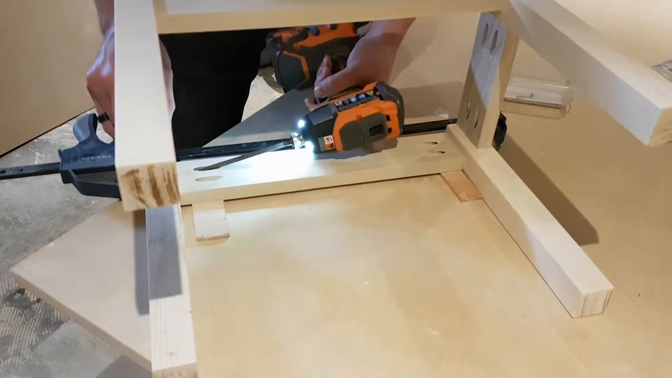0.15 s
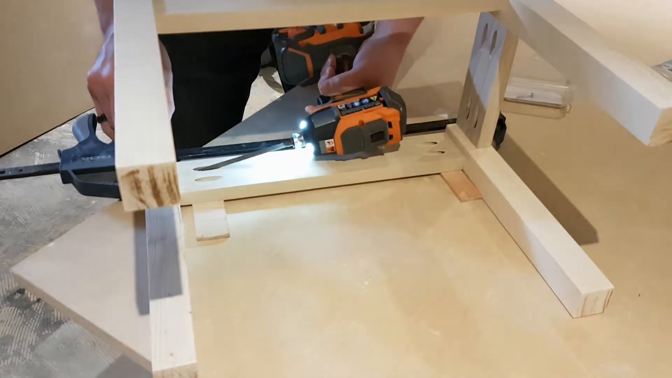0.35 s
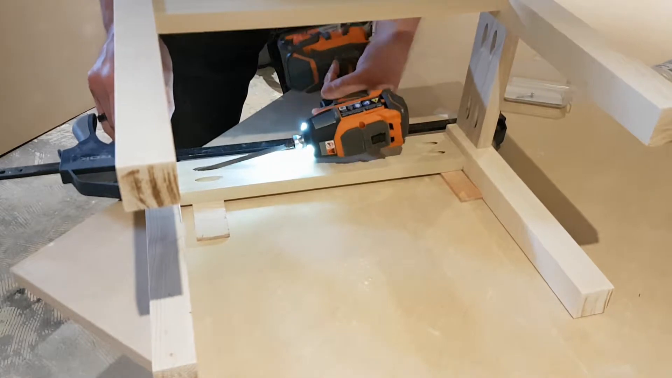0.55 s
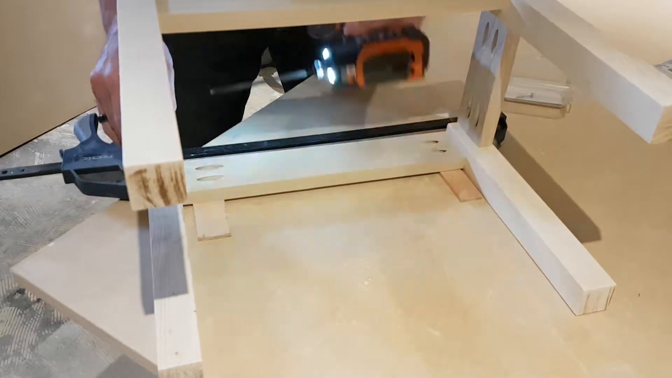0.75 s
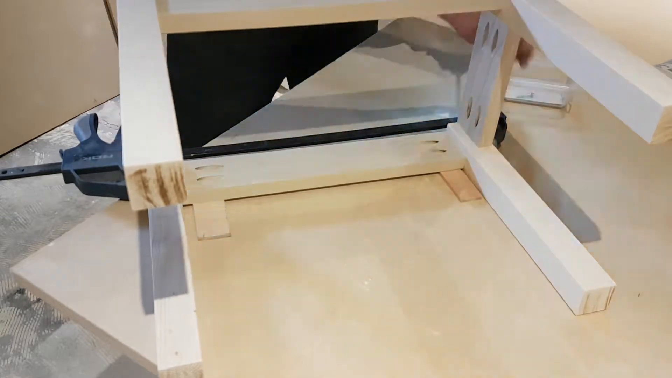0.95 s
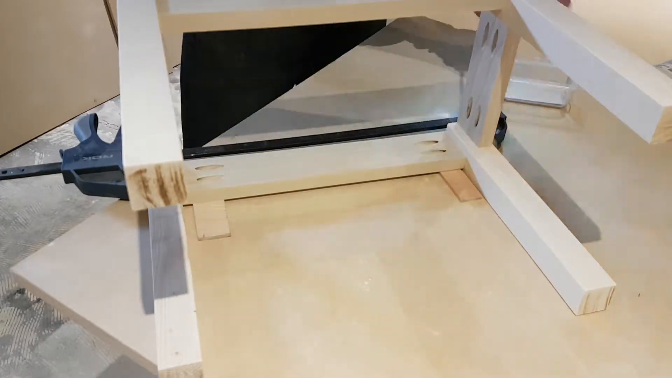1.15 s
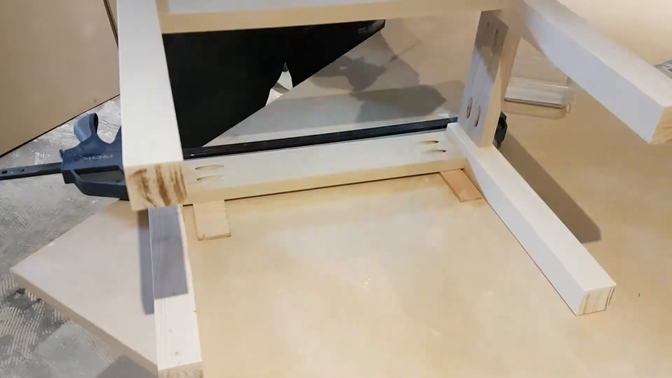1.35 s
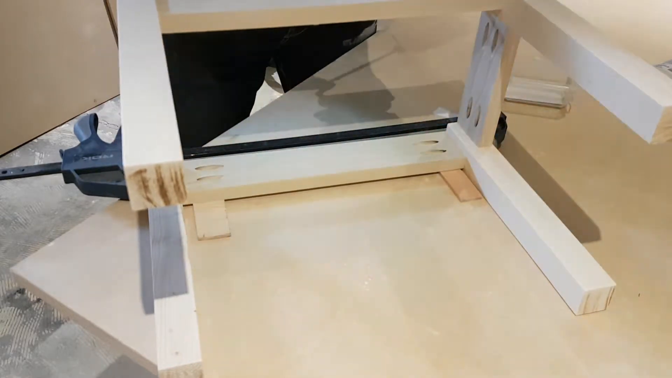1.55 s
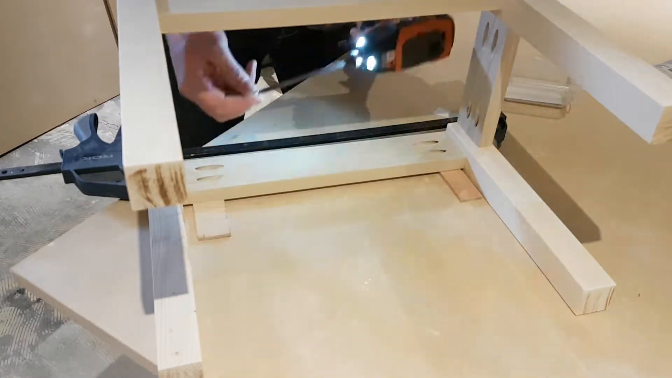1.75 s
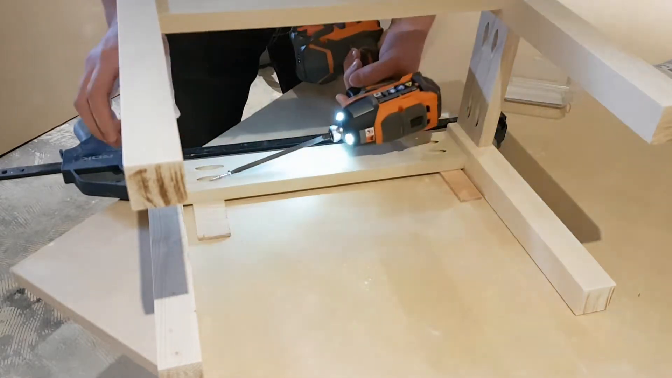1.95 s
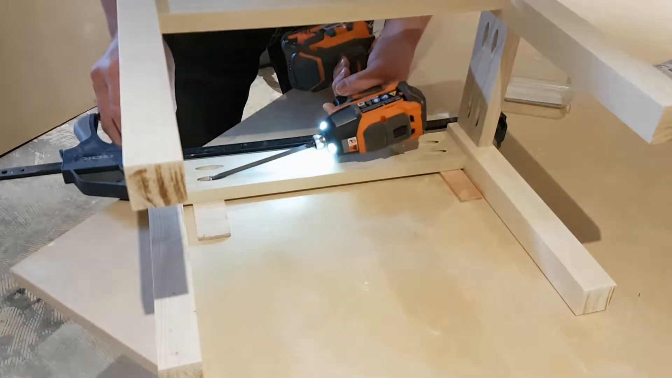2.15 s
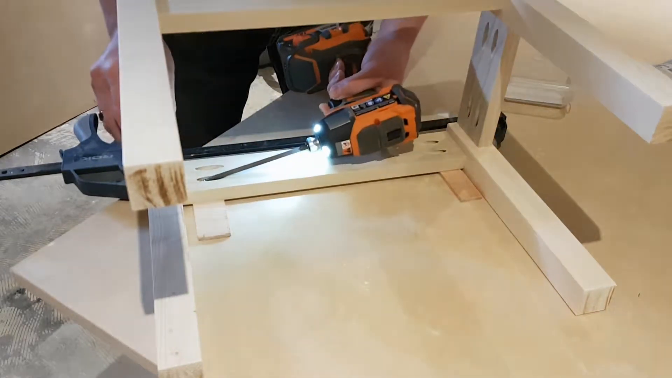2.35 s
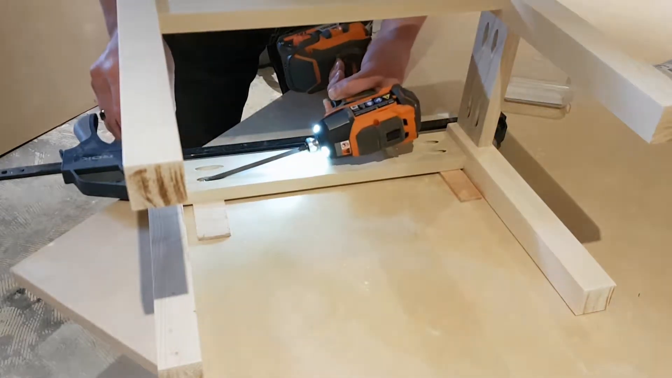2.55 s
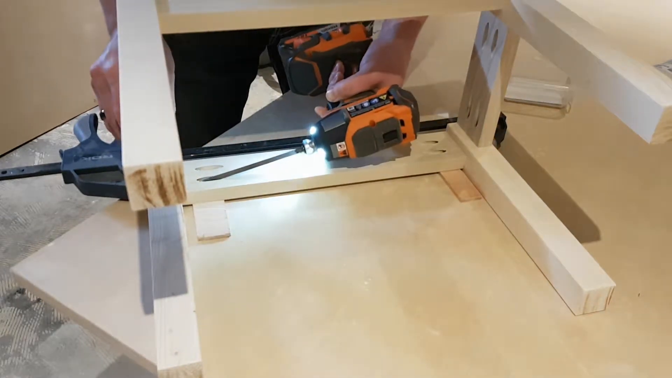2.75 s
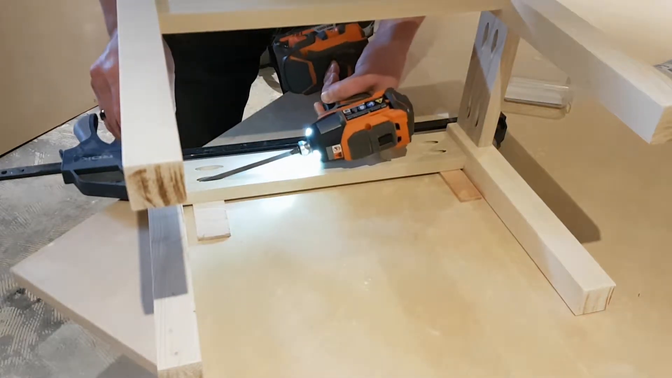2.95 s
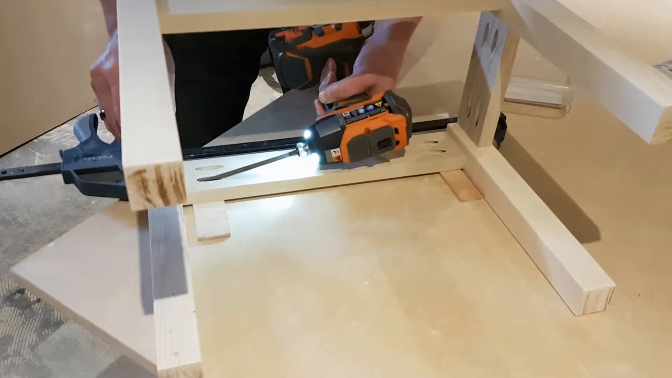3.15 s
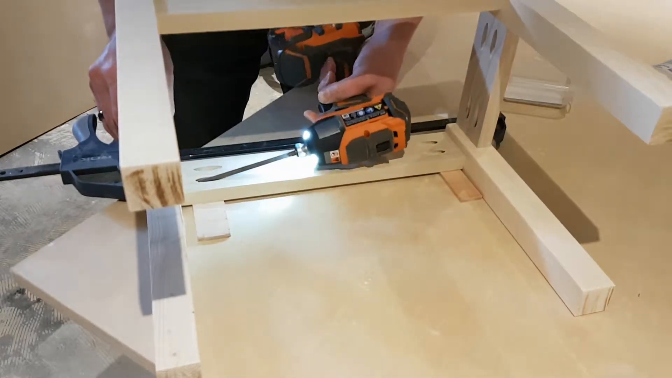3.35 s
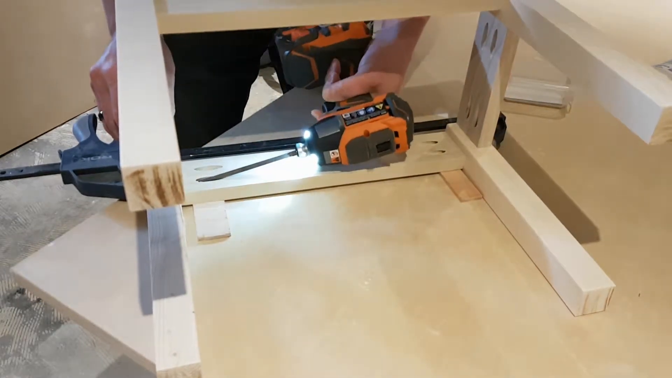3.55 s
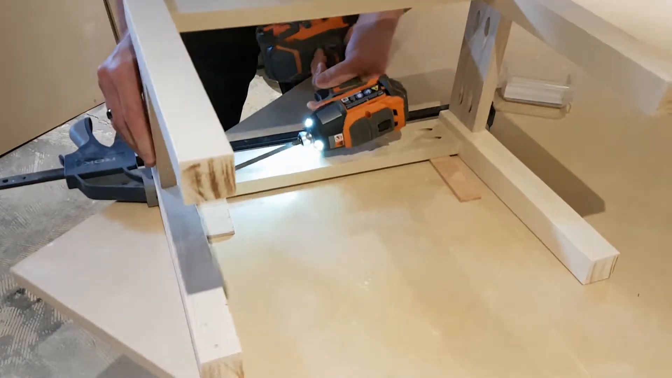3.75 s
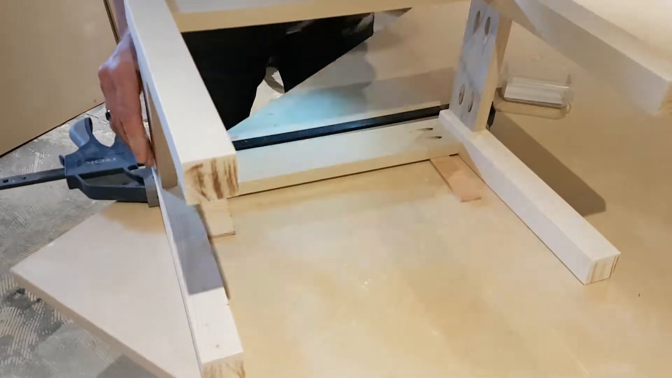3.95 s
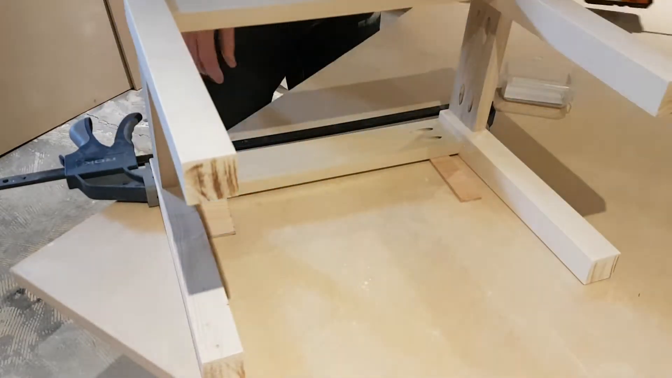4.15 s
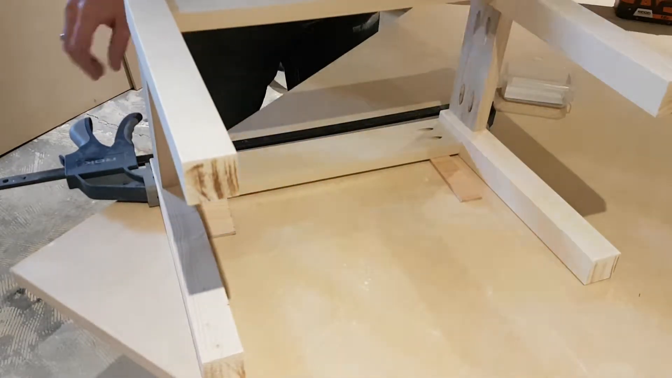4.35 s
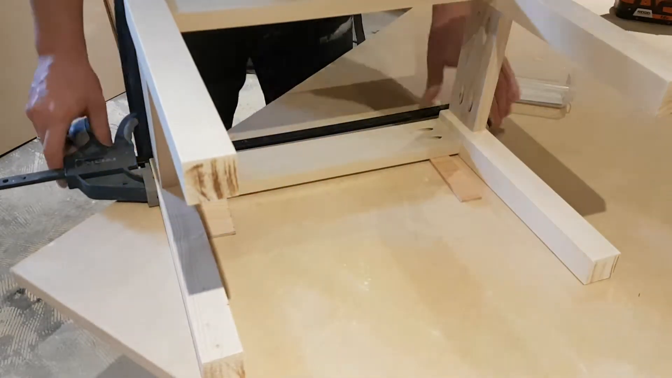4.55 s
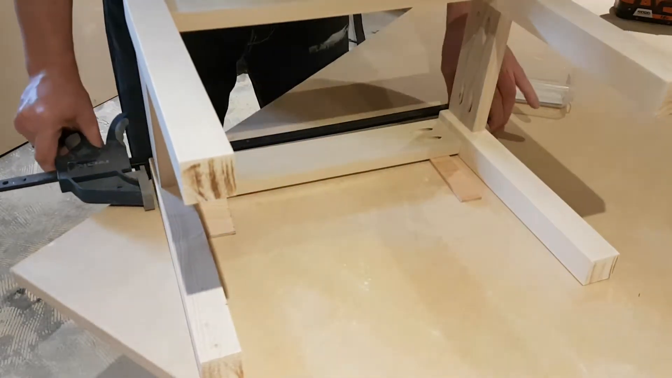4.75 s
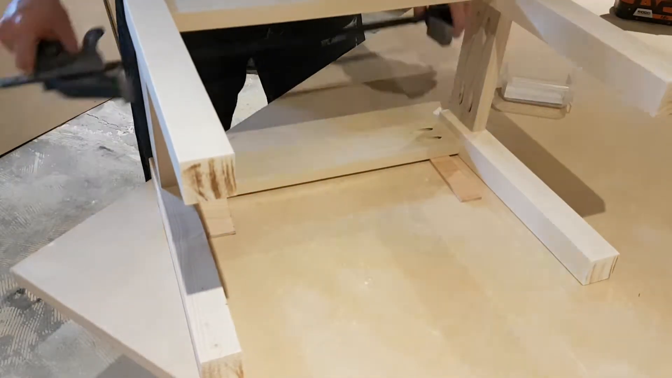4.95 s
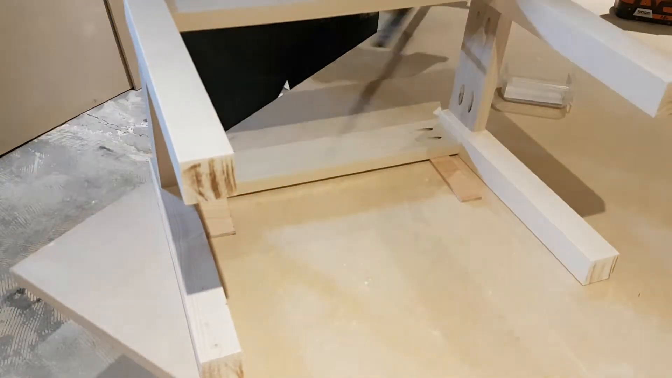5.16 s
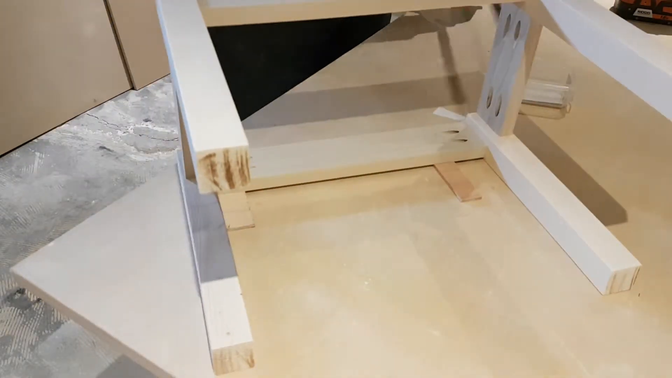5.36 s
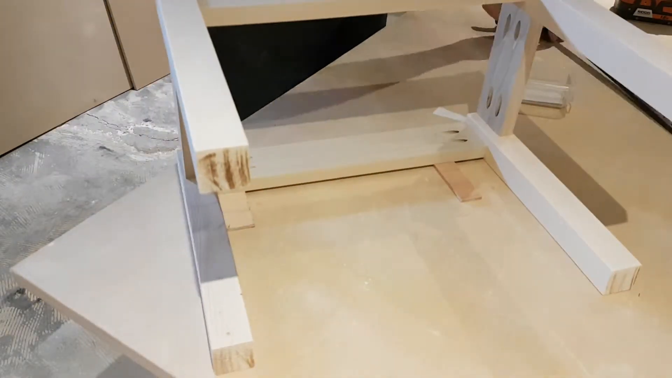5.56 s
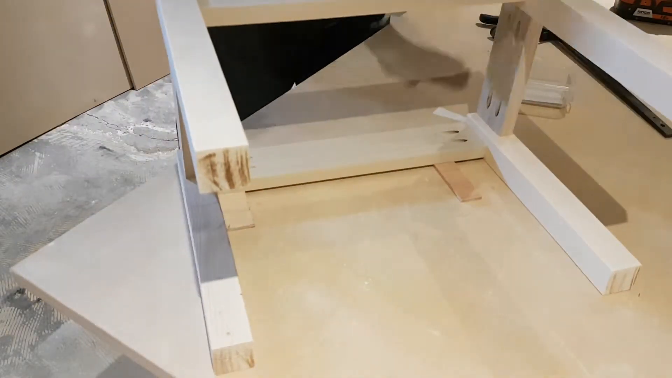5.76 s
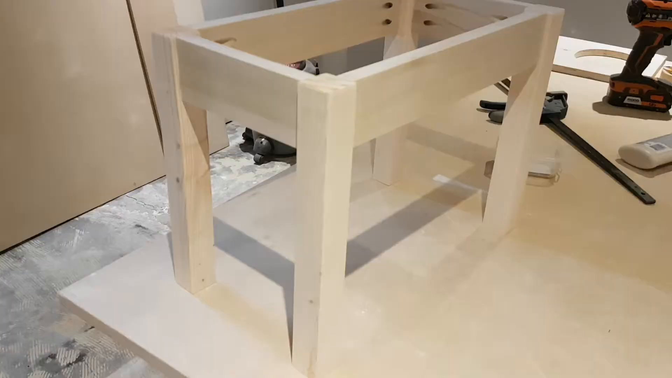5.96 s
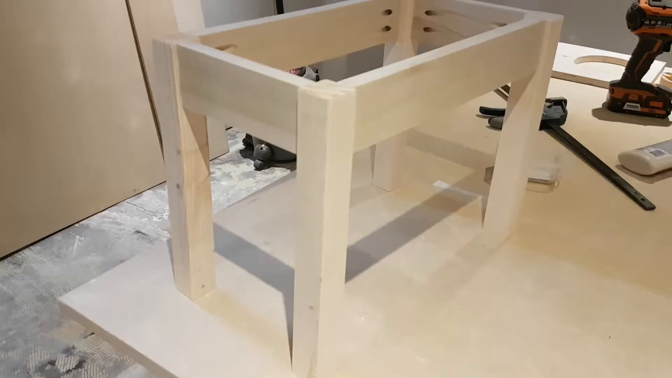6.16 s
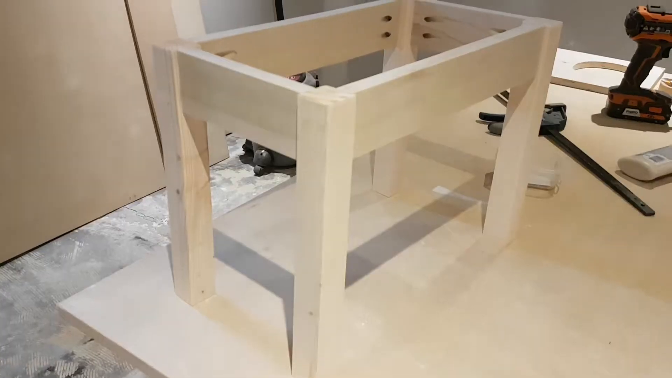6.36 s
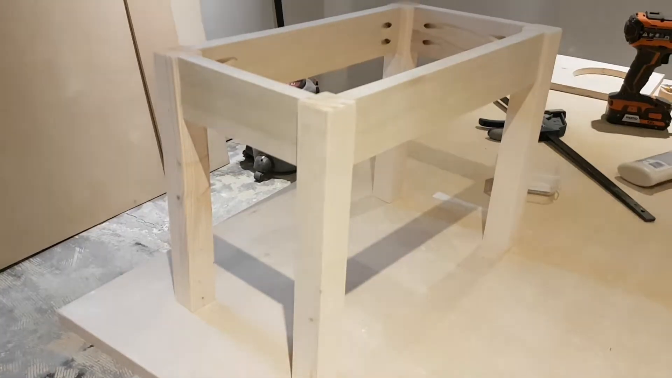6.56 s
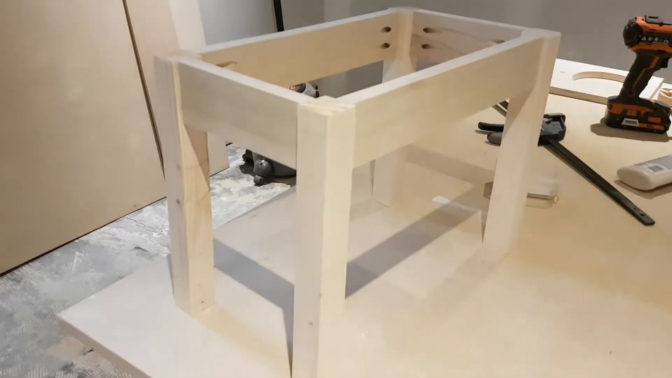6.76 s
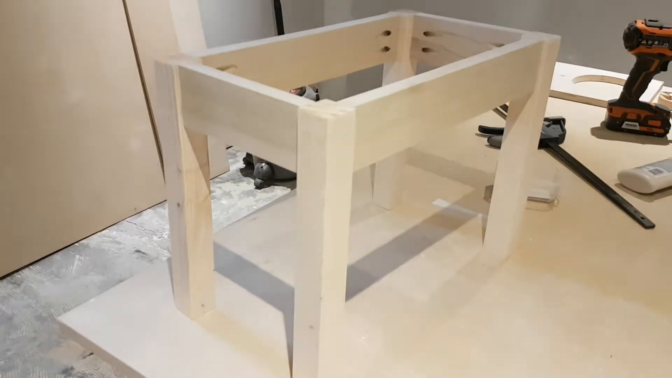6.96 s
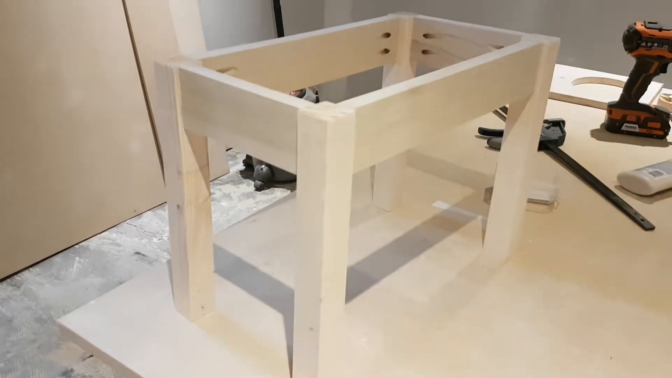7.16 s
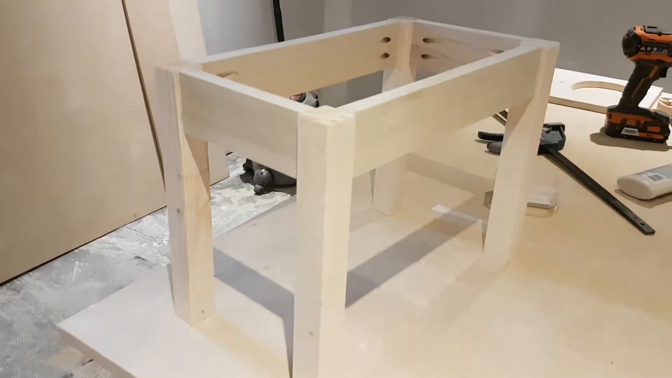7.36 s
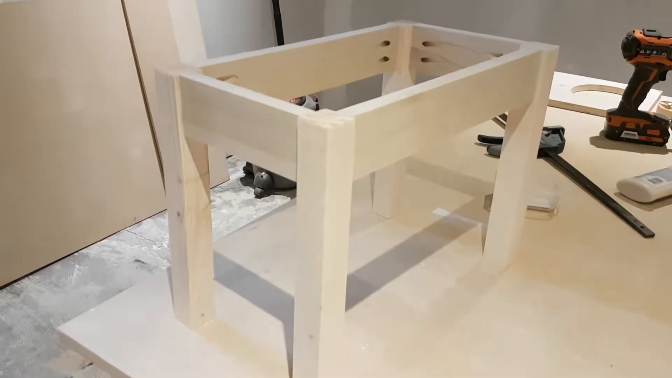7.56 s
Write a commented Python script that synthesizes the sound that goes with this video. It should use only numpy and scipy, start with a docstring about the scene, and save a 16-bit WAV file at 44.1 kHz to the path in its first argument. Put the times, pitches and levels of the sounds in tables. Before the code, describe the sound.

A cordless drill squeaks and judders in short bursts driving screws into a wooden frame, then clamp clacks and hard wooden knocks in a small workshop.

```python
"""A cordless drill drives pocket screws into a wooden frame in a small workshop.
It turns in short surges: stick-slip trains squeak and judder through the frame's resonances, over motor whine.
Then the frame is shifted, a bar clamp snaps open and slides off, and the frame is set down on a board:
filtered noise bursts for knocks and scrapes, a decaying sine for the bar. Room noise, hum and hiss lie below."""
import sys
import numpy as np
from scipy import signal
from scipy.fft import rfft, irfft, next_fast_len
from scipy.io import wavfile
from scipy.ndimage import uniform_filter1d

SR = 44100
rng = np.random.default_rng(int(sys.argv[2]) if len(sys.argv) > 2 else 0)


def pcm_store(signal):
    """Save signal as 16-bit PCM."""
    levels = np.round(np.clip(np.atleast_2d(signal), -1, 1) * 32767)
    wavfile.write(sys.argv[1], SR, levels.astype(np.int16).T)


N = 335468  # samples
TAPS = 8192
HZ = np.fft.rfftfreq(TAPS, 1 / SR)

# drill surges: (bite time [s], rise [s], hold [s], relative level [dB], binding [0-1],
# squeal [Hz], squeal lift [dB], rasp lift [dB], motor whine level [dB])
SURGE_TABLE = [(-.04, .021, .019, -16, 0.09, 2220, 5, 1, -49.5),
               (0.063, 0.022, 0.022, -16.5, .2, 2180, 5.5, 0.5, -54),
               (.183, 0.022, 0.037, -15, 0.86, 2260, 6, -2.5, -50),
               (.298, 0.025, 0.021, -15, 0.98, 2250, 3, -3.5, -53.5),
               (2.615, 0.009, .008, -42, .3, 850, 6, -11, -45.5),
               (2.625, 0.0076, 0.02, -19, 0.97, 4320, -2.5, 6, -43),
               (2.742, 0.023, 0.03, -22, 0.48, 3540, 4, 5.5, -44),
               (2.869, 0.023, .015, -19, 0.46, 2250, 0, 1.5, -46),
               (2.977, 0.026, .018, -20.5, .25, 1970, 5.5, -1, -41.5),
               (3.088, 0.018, 0.021, -28, 0.11, 850, 8.5, -11, -40.5),
               (3.193, 0.022, 0.059, -16.5, 0.88, 2130, 0, -2, -45.5),
               (3.355, 0.015, 0.021, -15.5, 0.92, 1400, 7, -0.5, -55.5)]
# click of touching surfaces: (frequency [Hz], relative density [dB per Hz])
CLICK_SPECTRUM = [(500, -10.5), (3000, 5.5), (6800, -2.5), (9000, -15.5), (12500, -16), (16000, -13.5)]


def screw():
    """The thread squeaks by stick-slip in each surge; where it binds, coarse slips shake the frame."""
    # thread stick-slip: (frequency [Hz], relative density [dB per Hz])
    squeak_spectrum = [(100, -39.5), (450, -16.5), (700, -7), (1050, -9), (1500, -2.5), (2200, -3),
                       (3100, -8), (4400, -5.5), (5500, -14.5), (7200, -15.5), (8800, -26.5),
                       (12500, -29.5), (16000, -30)]
    # coarse slips when binding: (frequency [Hz], relative density [dB per Hz])
    judder_spectrum = [(30, -12.5), (70, -1.5), (140, -1), (300, -0.5), (600, -0.5), (1300, 0),
                       (2500, -5.5), (7000, -13.5), (9000, -23.5), (12500, -15), (16000, -22.5)]
    slips_per_s, judder_per_s = 760, 380
    sag_db_per_s = 78  # the push tires while held
    free_rough, bound_rough = .3, .75  # a binding screw slips more unevenly
    free_judder_db, bound_judder_db = -18.5, -1.5  # relative, and shakes the frame harder
    judder_onset = 0.9  # share of the rise

    out, frame = np.zeros(N), frame_gain()
    rasp_band = 1 / (1 + (3000 / (HZ + 1)) ** 4)
    for bite_s, rise_s, hold_s, db, binding, squeal_hz, squeal_db, rasp_db, _ in SURGE_TABLE:
        t, push = stroke(rise_s, hold_s, -sag_db_per_s * hold_s, foot_db=-25)
        push = push * flutter(t, depth_db=2.8, step_s=.004)

        rough = blend(free_rough, bound_rough, binding)
        squeak = slips(t, slips_per_s, jitter=.45 * rough, spread_db=2)
        squeak = unit(squeak + .5 * rng.standard_normal(len(t)))
        tone_db = read(squeak_spectrum) + rasp_db * rasp_band + squeal_db * bump(squeal_hz, octaves=0.1)
        add(out, bite_s, amp(db) * colour(squeak * push, frame * amp(tone_db)))

        judder_db = blend(free_judder_db, bound_judder_db, binding)
        bound = np.clip((t - judder_onset * rise_s) / 0.014, 0, 1)
        judder = slips(t, judder_per_s, jitter=.5, spread_db=0)
        judder = judder + .5 * rng.standard_normal(len(t))
        shaken = colour(judder * push * bound, frame * amp(read(judder_spectrum)))
        add(out, bite_s, amp(db + judder_db - 1.5) * shaken)
    return out


def motor(tick_db=-48, gears_db=-4, overtone_db=-21):
    """Each start gives a thin tick, then the whine of the chopped motor current over gear noise."""
    whine_hz, waver_share = 3860, 0.089
    lead_s = 0.012  # the motor switches on this long before the screw bites
    # (frequency [Hz], relative density [dB per Hz])
    gear_spectrum = [(150, -9), (800, 2), (1900, 1), (3000, -5), (5600, -8.5), (9000, -28)]
    tick_spectrum = [(1500, -15), (6000, 1), (15000, 3)]

    out = np.zeros(N)
    for bite_s, rise_s, hold_s, *_, db in SURGE_TABLE:
        start_s = bite_s - lead_s
        t, on = stroke(0.0068, rise_s + hold_s, foot_db=-11, half_fade_s=.008)
        tick, gears, waver = rng.standard_normal((3, len(t)))
        phase = 2 * np.pi * np.cumsum(whine_hz * (1 + waver_share * waver)) / SR
        whine = np.sqrt(2) * (np.sin(phase) + amp(overtone_db) * np.sin(2 * phase))
        add(out, start_s, amp(db) * on * whine)
        add(out, start_s, amp(db + gears_db) * colour(on * gears, amp(read(gear_spectrum))))
        tick = tick * np.exp(-t / 0.0044)
        add(out, start_s, amp(tick_db) * colour(tick, amp(read(tick_spectrum))))
    return out


def knocks(chatter_db=3):
    """In each blow the surfaces graze, meet in a sharp push and chatter for a few milliseconds."""
    # wood, drill and clamp: (contact time [s], relative level [dB], hardness [0-1],
    # struck part's resonance [Hz], its lift [dB])
    blow_table = [(.545, -55.5, 0.25, 166.5, 20), (0.641, -51.5, 0.49, 203, 18),
                  (1.036, -45.5, 0.4, 602, 9), (1.081, -56.5, 0.64, 301, 13), (1.424, -53, 0.65, 448, 22),
                  (1.519, -69, 0.98, 303, -10), (1.661, -66, 0.75, 301.5, -12),
                  (1.772, -58.5, 0.66, 200, -3), (2.014, -59, 0.57, 201, -8), (2.048, -49.5, 0.42, 303, 12),
                  (2.283, -46, 0.4, 434, 14), (2.442, -51, 0.6, 148, 21.5), (2.516, -59.5, 0.51, 200, 1),
                  (2.59, -57, 0.78, 200, -4), (2.634, -22, 0.86, 200, -1), (3.029, -27, 0.57, 1890, 15),
                  (3.226, -18, 0.74, 200, 0), (3.387, -23.5, 0.48, 298, .5), (3.647, -28, 0.52, 1700, 8.5),
                  (3.798, -43.5, 0.55, 159, 14.5), (3.857, -39, 0.18, 130, 16), (3.862, -33, 0.4, 1930, 9),
                  (4.347, -40, .26, 140, 18.5), (4.405, -50.5, 0.37, 130.7, 21),
                  (4.596, -57, .05, 141.5, 24.5), (4.644, -57, 0.14, 138, 26),
                  (4.761, -30.5, 0.68, 300, -14), (4.764, -19.5, 0.76, 400, 11.5),
                  (4.770, -22, 0.49, 159, 20.5), (4.89, -44.5, 0.65, 203, 1.5),
                  (5.162, -43.5, 0.67, 3000, 7), (5.259, -22.5, .45, 400, 6.5),
                  (5.264, -27.5, 0.35, 286, 15), (5.594, -26.5, 0.24, 260, 9.5),
                  (5.697, -14.5, 0.24, 1100, 3.5), (5.703, -14, 0.38, 200, 6)]
    # a harder knock is brighter, clicks more and chatters less
    soft_corner_hz, hard_corner_hz = 596, 6040
    soft_click_db, hard_click_db = -50.5, 14
    soft_chatter_s, hard_chatter_s = .008, .0016  # twice the decay constant

    out, t = np.zeros(N), np.arange(SR // 10) / SR
    for contact_s, db, hardness, ring_hz, ring_db in blow_table:
        corner_hz = soft_corner_hz * (hard_corner_hz / soft_corner_hz) ** hardness
        click_db = blend(soft_click_db, hard_click_db, hardness)
        chatter_s = soft_chatter_s * (hard_chatter_s / soft_chatter_s) ** hardness
        graze_s = np.clip(chatter_s, 1e-3, .03) / 2
        blow = rng.standard_normal(len(t)) * t * np.exp(-t / graze_s)
        blow *= amp(chatter_db) / np.linalg.norm(blow)
        blow[round(graze_s * SR)] += 1  # the sharp push
        ring = colour(even(blow, size=41), contact(ring_db, ring_hz, corner_hz, click_db))
        add(out, contact_s - graze_s, amp(db + 27) * ring / np.linalg.norm(ring))
    return out


def contact(ring_db, ring_hz, corner_hz, click_db):
    """Contact spectrum: struck part's resonance, a body a harder touch extends upward, a surface click."""
    # any contact with the frame: (frequency [Hz], relative density [dB per Hz])
    body_spectrum = [(20, -19.5), (45, -9), (80, -2), (140, -4), (400, 0.5), (750, -1), (1300, 3),
                     (2300, 4), (4000, -2)]
    ring_octaves = .85 * (200 / ring_hz) ** .35  # higher resonances are narrower
    body = amp(read(body_spectrum) + ring_db * bump(ring_hz, ring_octaves))
    softness = 1 / np.sqrt(1 + (HZ / corner_hz) ** 6)
    # a stronger click is also briefer, so it reaches further into the treble
    snap_db = np.clip(.45 * (click_db + 14), -6, 8) * bump(11500, octaves=.4)
    click = amp(click_db + snap_db + read(CLICK_SPECTRUM))
    low_cut = (HZ + 10) / np.hypot(HZ, 40)
    return frame_gain() * np.hypot(body * softness, click) * low_cut


def scrapes(grain_db=4.0):
    """Sliding surfaces catch on many small grains: a rasp, the frame's rumble and a fine hiss."""
    # slides on wood: (start [s], length before fade [s], relative level [dB], rasp [Hz],
    # rasp width [octaves], rumble lift [dB])
    slide_table = [(0.661, 0.068, -51.5, 1495, 0.74, 20), (0.713, 0.051, -47.5, 2200, 0.19, -4),
                   (3.663, 0.082, -45, 1400, 0.76, 16), (3.788, .058, -52, 1600, 0.71, 13.5),
                   (3.86, 0.042, -49, 1700, .6, 5), (4.599, 0.091, -69, 2000, 1, 5.5),
                   (4.827, 0.047, -56.5, 2200, 1, 3), (5.018, 0.056, -46, 2390, 0.37, -15),
                   (5.054, .045, -39.5, 2040, 0.74, -13.5), (5.147, 0.058, -41.5, 2300, 0.93, -13),
                   (6.617, 0.15, -68, 1200, 1, 14)]
    # frame under a sliding touch: (frequency [Hz], relative density [dB per Hz])
    rumble_spectrum = [(20, -10), (90, 1.5), (160, -1.5), (320, -0.5), (600, -1), (1500, -6), (3500, -23),
                       (8000, -65)]
    swell_share = 0.48  # part of a slide spent building up pressure
    hiss_base_db, hiss_db_per_octave = -29, 26  # the broader the rasp, the more it hisses

    out = np.zeros(N)
    for start_s, length_s, db, rasp_hz, octaves, rumble_db in slide_table:
        rise_s, hold_s = swell_share * length_s, (1 - swell_share) * length_s
        t, push = stroke(rise_s, hold_s, foot_db=-18, half_fade_s=.014)
        noise, size = rng.standard_normal((2, len(t)))
        grains = unit(noise * amp(grain_db * unit(uniform_filter1d(size, 40))))
        rasp = bump(rasp_hz, octaves)
        rumble = amp(rumble_db + read(rumble_spectrum))
        hiss = amp(hiss_base_db + hiss_db_per_octave * octaves + read(CLICK_SPECTRUM))
        tone = np.linalg.norm([rasp, rumble, hiss], axis=0)
        add(out, start_s, amp(db) * colour(grains * push, frame_gain() * tone))
    return out


def clamp_bar():
    """The steel bar of the clamp rings on faintly after a hard jolt: a decaying sine."""
    # jolts: (time [s], peak level [dB])
    jolt_table = [(3.387, -50.5), (5.703, -55.5)]
    bar_hz, t60_s = 556, 0.73
    out, t = np.zeros(N), np.arange(SR) / SR
    for jolt_s, db in jolt_table:
        add(out, jolt_s, amp(db - 60 * t / t60_s) * np.sin(2 * np.pi * bar_hz * t))
    return out


def background(shared=0.47):
    """Low room noise, partly common to both channels, mains hum and a fine microphone hiss."""
    # room noise: (frequency [Hz], relative density [dB per Hz])
    air_spectrum = [(20, -13), (42, -4), (60, -7.5), (120, -8.5), (230, -13), (400, -14.5), (550, -16.5),
                    (900, -19), (2900, -25.5), (4500, -32.5), (15500, -46.5)]
    # room noise: (time [s], level [dB])
    air_level = [(0, -69), (5.95, -68), (6.02, -70), (7.6, -69.7)]
    # hum partials: (frequency [Hz], level before the hum gain [dB])
    hum_partials = [(59.2, -72.5), (236.9, -82), (296.1, -85.5), (468.3, -89)]
    # hum dips, then swells: (time [s], gain [dB])
    hum_gain = [(5.9, -4.5), (6.05, -13), (6.8, 1.5)]
    # (frequency [Hz], relative density [dB per Hz])
    hiss_spectrum = [(3000, -1), (9000, -8), (12500, -3), (16000, -5.5)]
    hiss_db = -78

    t = np.arange(N) / SR
    air_gain = amp(read(air_spectrum))
    left, right, common = (colour(rng.standard_normal(N + TAPS), air_gain)[TAPS:TAPS + N] for _ in range(3))
    air = unit(np.array([left, right]) + shared * common) * amp(np.interp(t, *np.transpose(air_level)))
    hum = np.zeros(N)
    for hz, db in hum_partials:
        hum += np.sqrt(2) * amp(db) * np.sin(2 * np.pi * (hz * t + rng.random()))
    hum *= amp(np.interp(t, *np.transpose(hum_gain)))
    hiss = np.array([colour(rng.standard_normal(N), amp(read(hiss_spectrum)))[:N] for _ in range(2)])
    return air + hum + amp(hiss_db) * hiss


def workshop(x, direct_db, lag_s, count=5):
    """Parts of the frame radiate in turn by their own paths; left microphone up to lag_s further off."""
    turn = np.arange(N) / SR / .007  # 7 ms per part
    out = np.zeros((2, N))
    for k in range(count):
        share = np.cos(np.pi / 2 * np.minimum(abs((turn - k + 1) % count - 1), 1))
        paths = np.array([path(direct_db, lag_s * (k + 1) / count), path(direct_db, 0)])
        out += signal.oaconvolve((x * share)[None], paths, axes=1)[:, :N]
    return out


def path(direct_db, lag_s, build_s=0.00095):
    """Response from one part of the frame to one microphone: direct sound, then dense reflections."""
    # reverberation: (frequency [Hz], T60 [s])
    room_t60 = [(100, 0.14), (260, 0.088), (700, 0.14), (1840, 0.11), (4850, 0.086), (12800, 0.049)]
    t = np.arange(SR // 3) / SR
    hz, when, z = signal.stft(rng.standard_normal(len(t)) ** 3, SR, nperseg=256)
    decay = amp(-60 * when / read(room_t60, hz)[:, None])
    tail = signal.istft(z * decay, SR, nperseg=256)[1][:len(t)]
    tail *= 1 - np.exp(-t / build_s)
    tail /= np.linalg.norm(tail)
    tail[round(lag_s * SR)] += amp(direct_db)
    return even(tail)


def frame_gain():
    """Gain of the frame's resonances, which colour everything that touches it."""
    # frame on its board: (frequency [Hz], width [Hz], lift [dB])
    frame_modes = [(136, 36, 4), (292, 45, 4), (677, 45, 3), (802, 45, 3), (974, 35, 2), (1092, 40, 3),
                   (1212, 40, 2), (1388, 45, 5), (1659, 55, 5), (1958, 40, 4), (2146, 55, 3), (2745, 30, 4),
                   (4640, 50, 3)]
    return amp(sum(db / (1 + (2 * (HZ - hz) / width) ** 2) for hz, width, db in frame_modes))


def stroke(rise_s, hold_s, sag_db=0, foot_db=-26, half_fade_s=.012):
    """Times and envelope of a push that swells, holds and lets go."""
    rise_s, hold_s = max(rise_s, 1e-3), max(hold_s, 1e-3)
    t = np.arange(0, rise_s + hold_s + 2 * half_fade_s, 1 / SR)
    swell_db = foot_db * np.maximum(1 - t / rise_s, 0) ** 1.8
    corners_s = np.cumsum([rise_s, hold_s, 2 * half_fade_s])
    return t, amp(swell_db + np.interp(t, corners_s, [0, sag_db, sag_db - 43]))


def slips(t, rate_hz, jitter, spread_db):
    """A train of sudden slips, uneven in spacing and size."""
    gap, size = rng.standard_normal((400, 2)).T
    at = (np.cumsum(np.exp(jitter * gap)) * SR / rate_hz).astype(int)
    keep = at < len(t)
    train = np.zeros(len(t))
    train[at[keep]] = amp(spread_db * np.clip(size[keep], -2, 2))
    return unit(train - train.mean())


def flutter(t, depth_db, step_s=.005):
    """Random unsteadiness of the pressure on a sliding contact."""
    knots = np.clip(rng.standard_normal(200), -1.6, 1.6)
    return amp(depth_db * np.interp(t / step_s, np.arange(len(knots)), knots))


def amp(db):
    """Decibels to gain."""
    return 10 ** (np.asarray(db) / 20)


def unit(x):
    """Scales to an rms of one."""
    return x / np.sqrt(np.mean(x ** 2) + 1e-20)


def blend(low, high, share):
    """The value a share of the way from low to high."""
    return low + (high - low) * share


def read(points, hz=HZ):
    """Reads a spectrum on a log-frequency axis."""
    f, value = np.transpose(points)
    return np.interp(np.log(hz + 1), np.log(f + 1), value)


def bump(hz, octaves):
    """A rounded hill of height one around a frequency."""
    return np.exp(-.5 * (np.log2((HZ + 1) / hz) / octaves) ** 2)


def add(mix, start_s, sound):
    """Adds a sound into the mix, cutting what falls outside."""
    start = round(start_s * SR)
    sound = sound[max(-start, 0):]
    part = mix[max(start, 0):][:len(sound)]
    part += sound[:len(part)]


def colour(x, gain):
    """Causal minimum-phase filter with the given magnitude, scaled to unit energy."""
    log_gain = np.log(np.maximum(unit(gain), 1e-4))
    circle = np.r_[log_gain, log_gain[-2:0:-1]]
    spectrum = np.exp(np.conj(signal.hilbert(circle)))[:len(HZ)]
    response = irfft(spectrum)[:len(HZ)]
    fade = np.cos(np.linspace(0, np.pi / 2, len(HZ))) ** 2
    return signal.fftconvolve(x, response * fade)


def even(x, size=9):
    """Smooths the broad hills and holes out of a short burst's spectrum, at unit energy."""
    power = uniform_filter1d(abs(rfft(x, TAPS)) ** 2, size)
    flat = colour(x, 1 / np.sqrt(power + 1e-3 * power.mean()))
    return flat / np.linalg.norm(flat)


def scene():
    """The drill sits a little to the right; the handling of the frame is nearer the middle."""
    # drill: (frequency [Hz], left minus right [dB])
    drill_side = [(200, -0.5), (900, -1), (1500, -2), (4500, -3.5), (7500, -2), (10000, 4), (15000, 1)]
    driving = screw() + motor()
    touches = knocks() + scrapes()
    drill = workshop(driving, direct_db=-5, lag_s=.0008)
    size = next_fast_len(N + TAPS)
    side = amp(read(drill_side, np.fft.rfftfreq(size, 1 / SR)) / 2)
    drill = irfft(rfft(drill, size) * np.array([side, 1 / side]), size)[:, :N]
    handling = workshop(touches, direct_db=-3.5, lag_s=.0009)
    return drill + handling + clamp_bar() + background()


def record(dry):
    """Rounds off the highest peaks, then limits the band."""
    edge_hz = 15950
    rounded = dry / (1 + (dry / .8) ** 4) ** .25
    lowpass = signal.firwin(511, edge_hz, window=("kaiser", 9), fs=SR)
    return signal.oaconvolve(rounded, lowpass[None], "same")


dry = scene()
out = record(dry)
pcm_store(out)
```